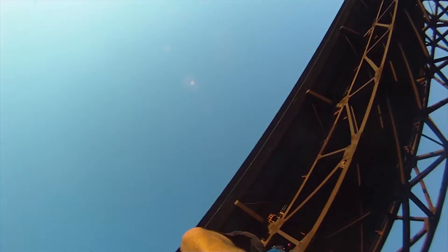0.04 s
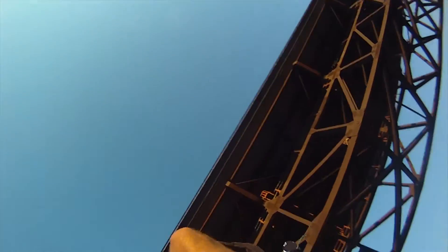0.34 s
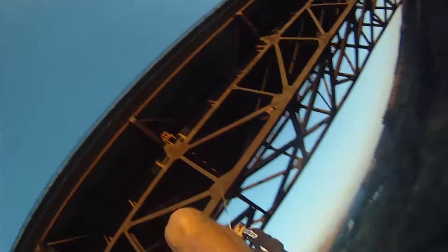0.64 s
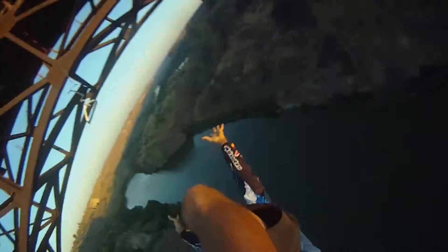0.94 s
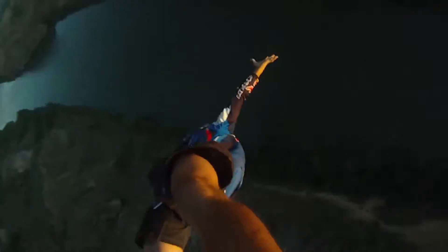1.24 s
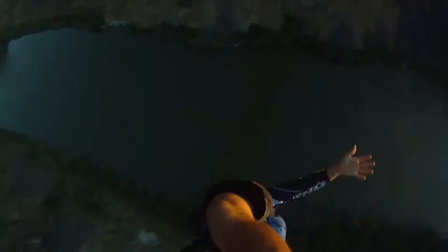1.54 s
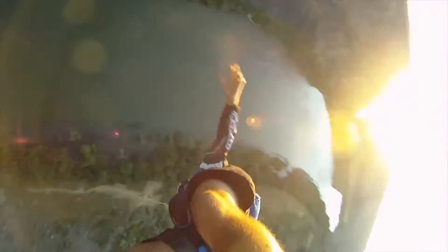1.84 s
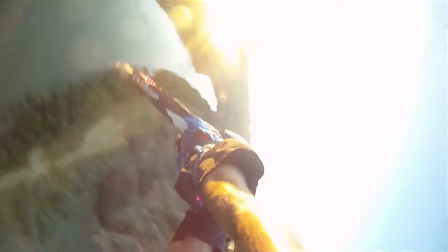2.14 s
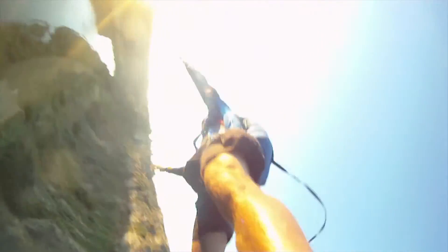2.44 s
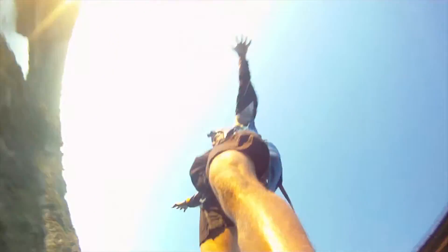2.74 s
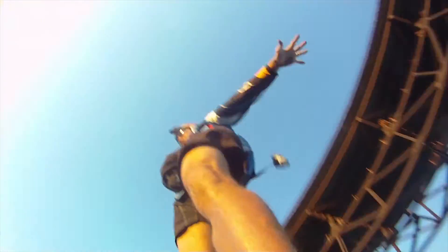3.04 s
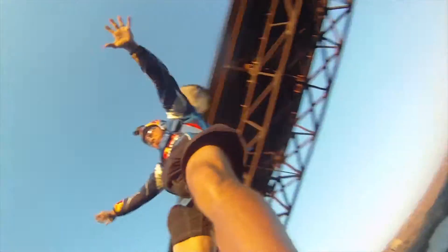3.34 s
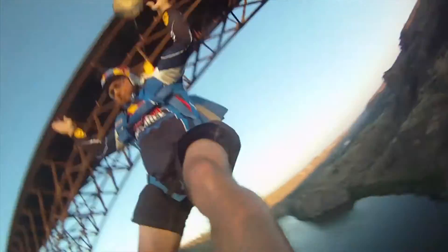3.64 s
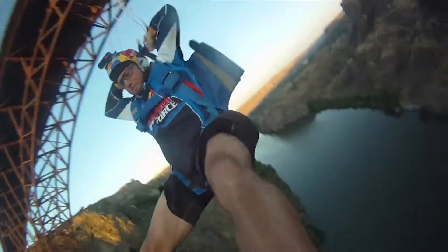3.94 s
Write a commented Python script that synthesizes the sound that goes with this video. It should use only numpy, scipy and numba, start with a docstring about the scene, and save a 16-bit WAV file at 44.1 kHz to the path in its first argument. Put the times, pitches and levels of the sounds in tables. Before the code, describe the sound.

Wind hisses over a microphone strapped to a falling jumper, with a thin ring of sliding webbing. From about 1 second the air quiets and cloth rubs and flaps, with buckle ticks, soft bumps and a tiny strap squeak. After 2 seconds the hiss returns and grows, with low buffeting from about 3.3 seconds. Gear snaps sharply near 3.7 seconds, briefly overloading the microphone, and a strong gust follows.

```python
"""A camera strapped to a jumper's leg tumbles through the air above a canyon.
At first, air hisses through its housing and sliding webbing rings it thinly. From about 1 s, in the lee,
cloth rubs, flaps, ticks and bumps against it, and a strap squeaks. After 2 s the hiss returns, and
turbulence buffets the microphone harder as the fall speeds up. Near 3.7 s a piece of gear snaps,
overloads the microphone and makes the gain control duck; a strong gust follows."""
import sys
import numpy as np
from scipy import signal
from scipy.fft import rfft, irfft
from scipy.io import wavfile
from scipy.ndimage import map_coordinates
from numba import njit

SR = 44100
rng = np.random.default_rng(int(sys.argv[2]) if len(sys.argv) > 2 else 0)


def wav_record(signal):
    """Record a signal, one row per channel, as 16-bit PCM in the file named by sys.argv[1]."""
    frames = np.transpose(np.atleast_2d(signal))
    bounded = np.clip(frames, -1, 1)
    # unit amplitude maps onto the largest positive 16-bit level
    quanta = np.round(bounded * 32767).astype(np.int16)
    wavfile.write(sys.argv[1], SR, quanta)


N = 176400

# broad response of the housing (frequency [Hz], gain [dB])
HOUSING_COLOUR = [(30, -17.5), (200, -8.5), (430, -13), (660, -14.5), (900, -2.5), (1250, -0.5),
                  (1700, -2.5), (2200, 0), (2750, -5), (3400, -8.5), (4100, -16), (4750, -17),
                  (5300, -20.5), (6000, -29.5), (6750, -20.5), (7900, -21), (9000, -15.5), (10800, -15),
                  (11500, -39), (12600, -43), (13200, -20), (15200, -21)]
# colour that a cloth contact adds to the housing's (frequency [Hz], gain [dB])
CLOTH_COLOUR = [(100, 13.5), (700, -5), (1150, -5.5), (1550, 3.5), (2050, 4), (2600, -7.5), (3700, -3.5),
                (6000, 3), (8500, -5), (10200, 1.5), (12000, -1), (13800, 2), (15200, -7)]
# colour that a hard contact adds to the housing's (frequency [Hz], gain [dB])
HARD_COLOUR = [(100, 23), (1200, -0.5), (2400, -4.5), (3500, 21.5), (4800, 13.5), (7200, 10), (8400, 26),
               (9500, -4.5), (15000, 17)]
FLUTTER_HZ, FRICTION_GRAIN_DB = 45.45, 4.5


def undb(db):
    """Amplitude ratio of a level in decibels."""
    return 10 ** (np.asarray(db) / 20)


def unit(x):
    """Normalisation to an rms of 1."""
    return x / np.sqrt(np.mean(x ** 2))


def curve(rows, t):
    """Linear interpolation between (time [s], value) points."""
    return np.interp(t, *np.array(rows).T)


def decay(age, seconds):
    """Exponential decay, silent before age 0."""
    return (age >= 0) * np.exp(-np.abs(age) / seconds)


def wander(hz):
    """Random modulation of rms 1: a spline through hz random values a second."""
    points = np.arange(N) * hz / SR
    return unit(map_coordinates(rng.standard_normal(8192), [points], order=3, mode="mirror"))


def rumble(hz):
    """Octave-band noise centred on hz, rms 1."""
    band = signal.butter(2, [hz / np.sqrt(2), hz * np.sqrt(2)], "bandpass", fs=SR, output="sos")
    return unit(signal.sosfilt(band, rng.standard_normal(N)))


def colour(points):
    """Magnitude response in dB, interpolated over log frequency."""
    hz, db = np.array(points).T
    return np.interp(np.log(np.arange(N + 1) * SR / (2 * N) + 1), np.log(hz), db)


def shape(x, db):
    """Minimum-phase filtering by a dB response, scaled so that white noise keeps its level."""
    cepstrum = irfft(np.log(unit(undb(db))))
    cepstrum[1:N] *= 2
    cepstrum[N + 1:] = 0
    return irfft(rfft(x, 2 * N) * np.exp(rfft(cepstrum)))[:N]


def ring(force, modes):
    """Modal superposition: a force is convolved with a sum of damped sinusoids."""
    t = np.arange(SR // 2) / SR
    response = sum(undb(db) * np.cos(2 * np.pi * hz * t) * np.exp(-np.log(1000) * t / t60)
                   for hz, db, t60 in modes)
    return signal.fftconvolve(force, response)[:N]


def housing_response():
    """Resonance: narrow peaks stand on the housing's broad dB response."""
    # resonances of the housing (frequency [Hz], width [Hz], lift [dB])
    resonances = [(1155, 55, 8.5), (1397, 84, 5.5), (2384, 224, 7.5), (2985, 33, 2), (3715, 190, 11.5),
                  (8304, 170, 12.5), (9694, 240, 10), (11100, 110, 3.5), (13170, 120, -5), (13900, 340, 12)]
    f = np.arange(N + 1) * SR / (2 * N)
    peaks = sum(db / (1 + (2 * (f - hz) / width) ** 2) for hz, width, db in resonances)
    return colour(HOUSING_COLOUR) + peaks


def webbing_slide(t):
    """Frictional excitation: webbing slides over the housing and rings two high modes."""
    # envelope of the zing (time [s], level [dB])
    levels = [(0, -43), (.4, -48), (.75, -48.5), (.9, -46), (.95, -79)]
    # modes rung by sliding (frequency [Hz], gain [dB], t60 [s])
    modes = [(3675, -4.5, 0.048), (8300, -6, 0.022)]
    friction = rng.standard_normal(N) * undb(FRICTION_GRAIN_DB * wander(FLUTTER_HZ))
    return undb(curve(levels, t)) * unit(ring(friction, modes))


def strap_squeak(t):
    """Stick-slip oscillation: a slipping strap makes a brief pulse train of falling pitch."""
    onset_s, start_hz, sag_s, jitter = 1.8243, 1150, .08, .091
    age = t - onset_s
    hz = start_hz * np.exp(-np.maximum(age, 0) / sag_s) * (1 + jitter * wander(500))
    phase = 2 * np.pi * np.cumsum(hz) / SR
    slips = sum(np.cos(k * phase) / np.sqrt(k) for k in range(1, 15))
    return shape(undb(-38) * decay(age, seconds=.011) * slips / 2, colour(HOUSING_COLOUR))


def cloth_rubs(t):
    """Sliding friction: fabric drags over the housing in swells of grainy noise."""
    # strokes of the cloth (peak time [s], swell [s], fade [s], level [dB])
    strokes = [(.948, 0.0076, 0.024, -46), (0.991, 0.031, .014, -28), (1.039, 0.017, 0.041, -41),
               (1.129, 0.014, 0.05, -43.5), (1.169, 0.016, 0.021, -36), (1.275, 0.017, 0.082, -48.5),
               (1.361, 0.0028, 0.021, -44), (1.393, 0.021, 0.039, -38), (1.435, 0.0088, 0.014, -42),
               (1.545, 0.0053, 0.016, -55.5), (1.565, 0.038, 0.025, -45), (1.683, .006, .012, -40),
               (1.725, .02, 0.0076, -47), (1.768, 0.0069, 0.0077, -36.5), (1.902, .016, 0.02, -45.5),
               (1.972, 0.0021, 0.0078, -37.5), (2.091, .005, 0.031, -42.5), (2.176, 0.0021, 0.0043, -39)]
    roundness, grain_hz = 1.95, 972
    pressure = sum(undb(db) * np.exp(-np.maximum((at - t) / swell, (t - at) / fade) ** roundness)
                   for at, swell, fade, db in strokes)
    grain = unit(rng.standard_normal(N) * undb(FRICTION_GRAIN_DB * wander(grain_hz)))
    return shape(pressure * grain, housing_response() + colour(CLOTH_COLOUR))


def cloth_flaps(t):
    """Damped transients: each flap of loose cloth is a dull burst of noise."""
    # flaps of the cloth (time [s], level [dB])
    flaps = [(0.943, -34), (1.07, -43), (1.295, -36.5), (1.328, -42.5), (1.388, -36), (1.422, -37),
             (1.433, -36.5), (1.478, -45), (1.73, -31), (1.85, -42), (1.885, -39.5)]
    # spectrum of a flap (frequency [Hz], gain [dB])
    spectrum = [(40, -21), (200, 0.5), (500, -2.5), (1000, -12.5), (2200, -19), (4000, -24), (15000, -32)]
    envelope = sum(undb(db) * decay(t - at, seconds=.0049) for at, db in flaps)
    return shape(envelope * rng.standard_normal(N), colour(spectrum))


def strap_bumps(t):
    """Impact excitation: soft Gaussian force pulses rock the camera on its strap."""
    # knocks on the camera (time [s], level [dB], contact time [s])
    knocks = [(0.738, -16.5, 0.009), (1.179, -19, 0.0033), (2.199, -18.5, 0.0073), (2.402, -19, .0035),
              (2.742, -17, 0.0028)]
    # modes of the strapped camera (frequency [Hz], gain [dB], t60 [s])
    modes = [(22.7, -1.5, 0.47), (87, 4.5, 0.019), (211, 13.5, 0.032)]
    force = sum(undb(db) * np.exp(-np.pi * ((t - at) / contact) ** 2) / (contact * SR)
                for at, db, contact in knocks)
    return ring(force, modes)


def buckle_ticks(t):
    """Impulse response: straps and buckles tap the housing with a tiny rattle, brighter when hard."""
    # taps on the housing (time [s], relative level [dB], hardness [0-1])
    taps = [(0.4117, -16, 0.58), (.694, -25.5, 0.56), (.888, -28, 0.66), (.994, -16.5, 0),
            (1.071, -32, 0.1), (1.362, -30, 0), (1.541, -34.5, 1), (1.6816, -28.5, 0.72), (1.768, -26, 0.5),
            (1.9713, -30, 0.4), (2.042, -34.5, 0.26), (2.090, -21, 0), (2.1737, -19.5, 0),
            (2.353, -16, 0.52), (2.5879, -13, 0.4)]
    soft, hard, rattle = np.zeros(N), np.zeros(N), rng.standard_normal(N)
    for at, db, hardness in taps:
        blow = .37 * rattle * decay(t - at, seconds=.00089)
        blow[int(at * SR)] += 1
        soft += undb(db) * (1 - hardness) * blow
        hard += undb(db) * hardness * blow
    housing = colour(HOUSING_COLOUR)
    return 3 * (shape(soft, housing + colour(CLOTH_COLOUR)) + shape(hard, housing + colour(HARD_COLOUR)))


def air_hiss(t, eddies):
    """Flow noise: air hisses through the resonant housing, louder and brighter when faster."""
    # airflow over the housing (time [s], level [dB])
    airflow = [(0, -34.5), (.33, -32.5), (.7, -40.5), (.92, -46.5), (1.1, -70), (1.25, -63), (1.62, -62.5),
               (1.95, -59.5), (2.08, -52), (2.22, -37.5), (2.32, -39), (2.48, -32.5), (2.74, -31.5),
               (2.84, -26), (3.02, -22), (3.125, -23), (3.155, -28.5), (3.27, -33), (3.52, -28.5),
               (3.72, -29.5), (3.81, -33), (3.915, -38.5), (3.945, -19), (4, -25.5)]
    tilt_per_db, neutral_db, drift_db = .15, -35, 1.5
    flow_db = curve(airflow, t)
    tilt_db = tilt_per_db * (flow_db - neutral_db)
    air = rng.standard_normal(N)
    lows = signal.sosfilt(signal.butter(1, 1800, fs=SR, output="sos"), air)
    air += lows * (undb(drift_db * wander(10) - tilt_db) - 1)
    flutter_db = wander(FLUTTER_HZ) + eddies
    return shape(air * undb(flow_db + flutter_db), housing_response())


def buffeting(t, eddies):
    """Turbulent pressure: eddies thud on the microphone, deeper as they grow, over slow swings."""
    # turbulence at the microphone (time [s], level [dB])
    turbulence = [(0, -40), (.7, -42), (1.1, -51.5), (1.6, -58), (2.1, -49.5), (2.5, -41), (3.15, -38.5),
                  (3.35, -29), (3.41, -29), (3.56, -23.5), (3.65, -28.5), (3.72, -22), (3.8, -24.5),
                  (3.915, -28.5), (3.937, -14), (4, -19.5)]
    # spectrum of the buffeting (frequency [Hz], gain [dB])
    spectrum = [(20, -13), (60, -4), (110, -2), (230, -3.5), (350, -12.5), (600, -19), (1200, -21),
                (2400, -22.5), (3300, -61), (5200, -36.5), (7000, -43), (15000, -33.5)]
    flutter_db, deep_growth = 1.5, 1.4
    strength = undb(curve(turbulence, t))
    flutter = unit(undb(flutter_db * eddies))
    thuds = shape(rng.standard_normal(N) * flutter * strength, colour(spectrum))
    deep = undb(1.5) * strength ** deep_growth * rumble(hz=89.5)
    swings = undb(-38) * rumble(hz=16.36)
    return thuds + deep + swings


def gear_snap(t):
    """Shock excitation: gear snaps taut, and a few milliseconds of crack ring its damped modes."""
    # modes of the gear (frequency [Hz], relative gain [dB], t60 [s])
    modes = [(1620, 2, 0.0073), (2210, 13, 0.0081), (3494, 14.5, 0.015), (4650, -15, 0.024),
             (7550, -12, 0.021), (8320, -7, 0.019), (9800, -39, .008), (14300, -10, .006)]
    onset_s, burst_s = 3.7391, .0032
    age = t - onset_s
    tail = undb(-18) * decay(age - burst_s, seconds=.0025)
    force = rng.standard_normal(N) * ((age >= 0) * (age < burst_s) + tail)
    body = ring(force, modes)
    crack = shape(force, colour(HOUSING_COLOUR) + colour(HARD_COLOUR))
    return undb(8.5) * (body / np.abs(body).max() + undb(-18) * crack)


def scene():
    """Superposition: all sources add at one microphone, the same in both channels."""
    t = np.arange(N) / SR
    eddies = wander(hz=40.1)  # hiss and buffeting flutter together
    mono = air_hiss(t, eddies) + buffeting(t, eddies)
    mono += webbing_slide(t) + cloth_rubs(t) + cloth_flaps(t) + strap_squeak(t)
    mono += buckle_ticks(t) + strap_bumps(t) + gear_snap(t)
    return np.array([mono, mono])


@njit
def follow_peaks(x, attack, release):
    """Envelope detection: one-pole smoothing with separate rates of rise and fall."""
    out, envelope = np.empty(len(x)), 0.
    for i in range(len(x)):
        envelope += (x[i] - envelope) * (attack if x[i] > envelope else release)
        out[i] = envelope
    return out


def record(dry):
    """Limiting: the gain ducks on overload and overshoot clips; the treble is notched and cut off."""
    # dips in the recorder's response (frequency [Hz], width [Hz])
    notches = [(6020, 840), (12000, 1350)]
    threshold_db, attack_s, release_s, cutoff_hz = -9, .0016, .14, 15400
    peak = follow_peaks(np.abs(dry).max(axis=0), 1 / (attack_s * SR), 1 / (release_s * SR))
    out = np.clip(dry / np.maximum(1, peak / undb(threshold_db)), -1, 1)
    for hz, width in notches:
        out = signal.lfilter(*signal.iirnotch(hz, hz / width, fs=SR), out)
    return signal.sosfilt(signal.ellip(8, .2, 70, cutoff_hz, fs=SR, output="sos"), out)


dry = scene()
out = record(dry)
wav_record(out)
```